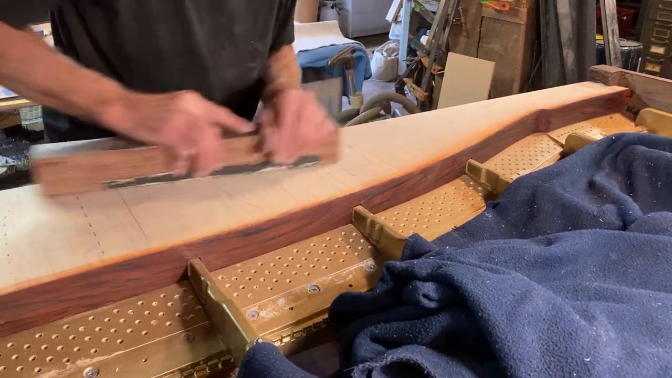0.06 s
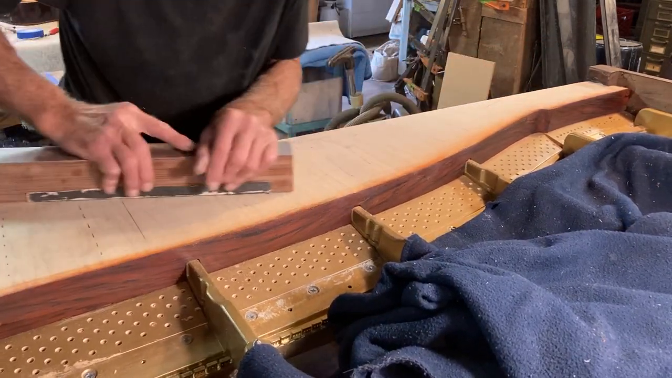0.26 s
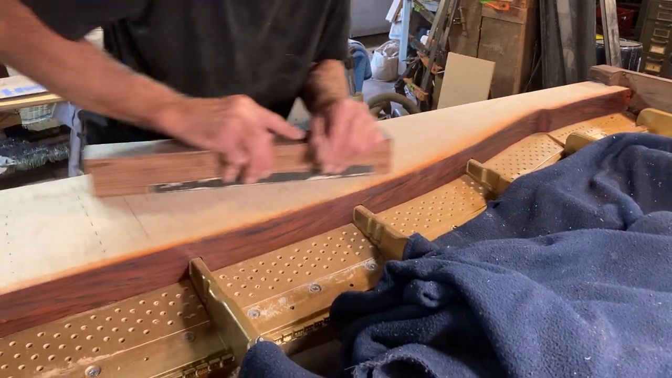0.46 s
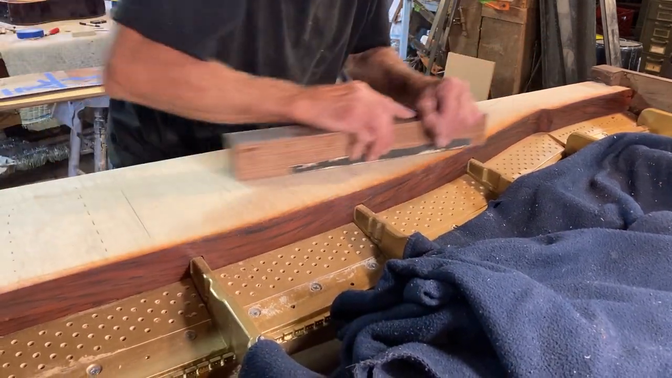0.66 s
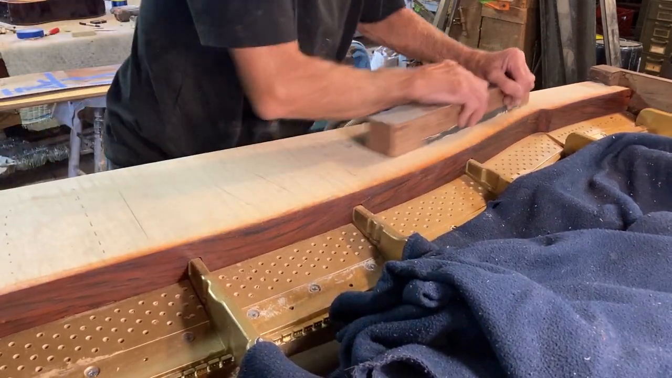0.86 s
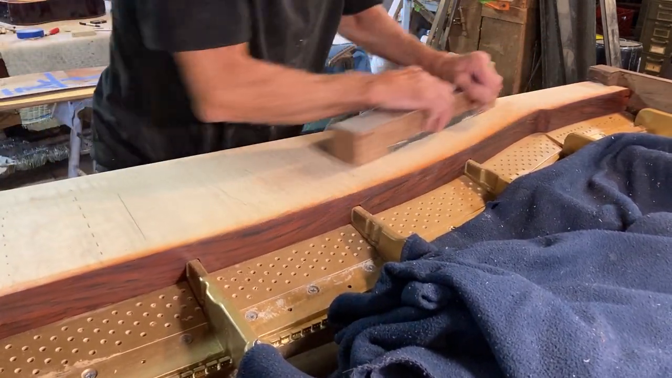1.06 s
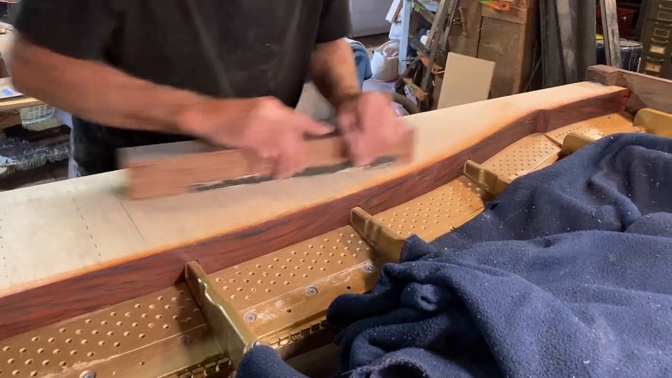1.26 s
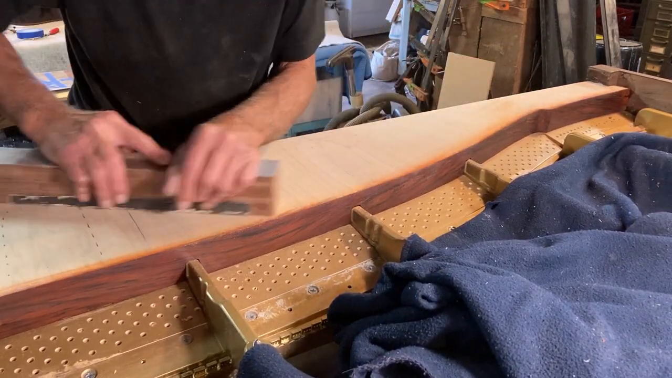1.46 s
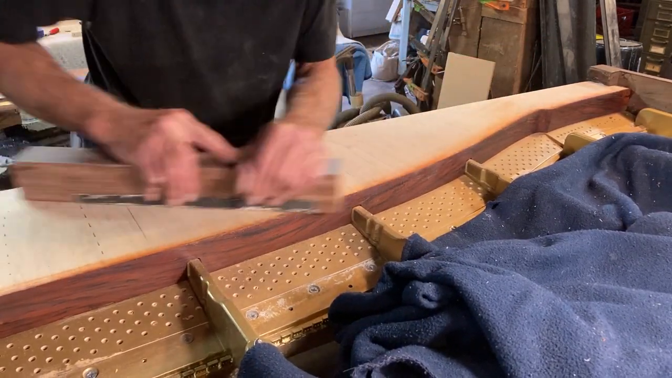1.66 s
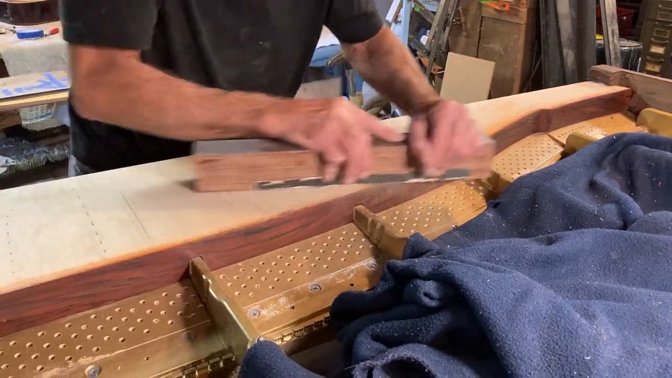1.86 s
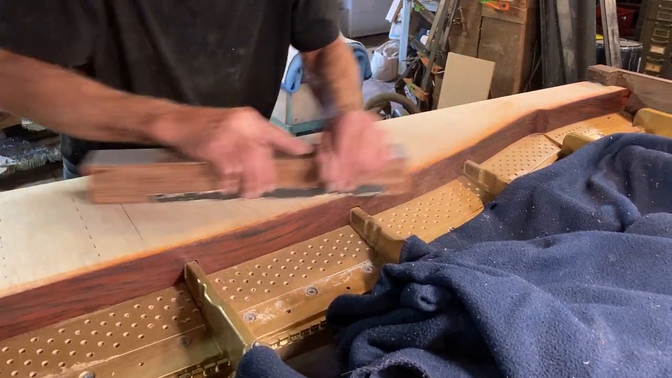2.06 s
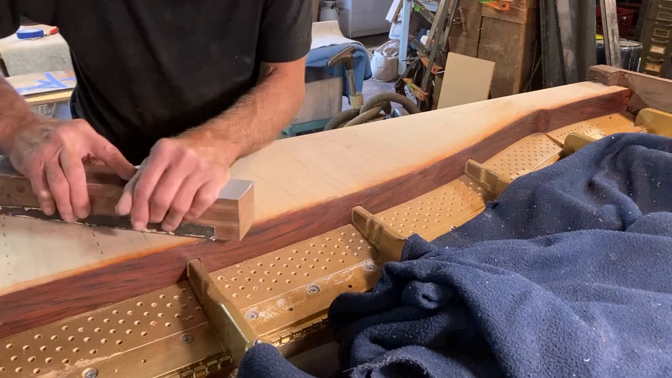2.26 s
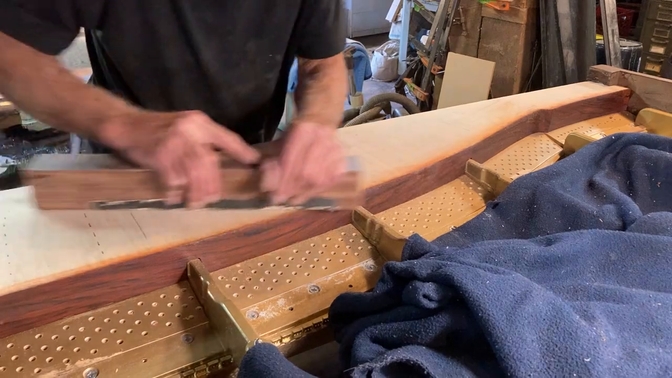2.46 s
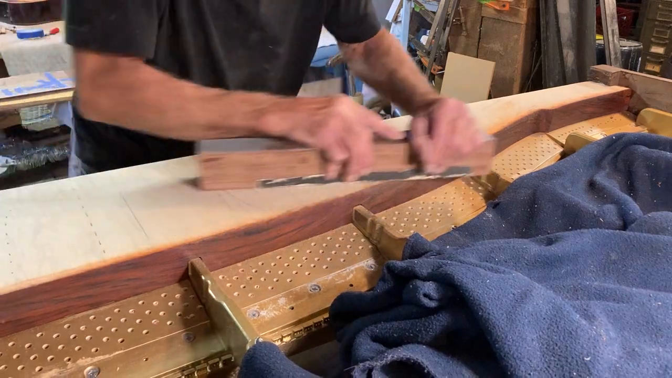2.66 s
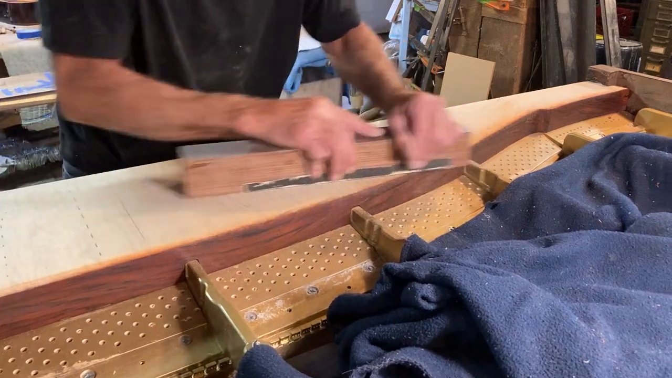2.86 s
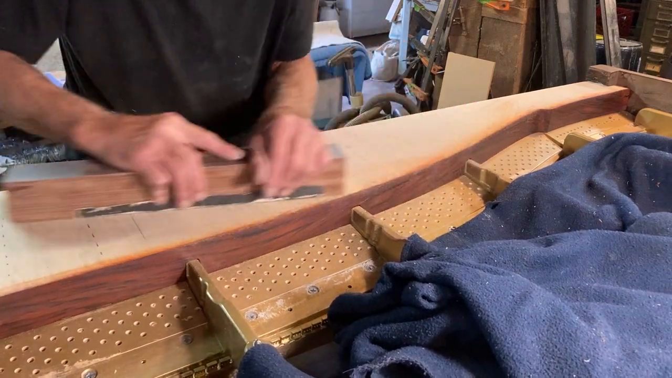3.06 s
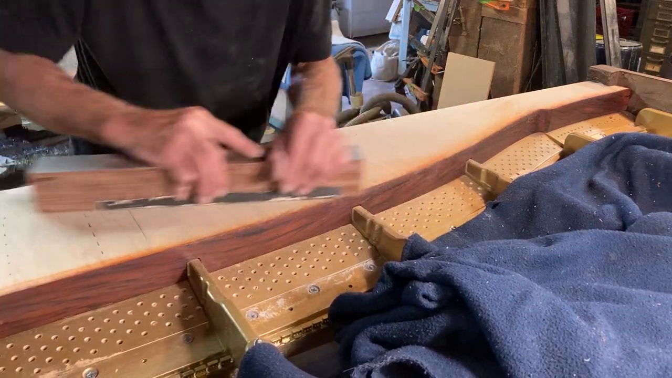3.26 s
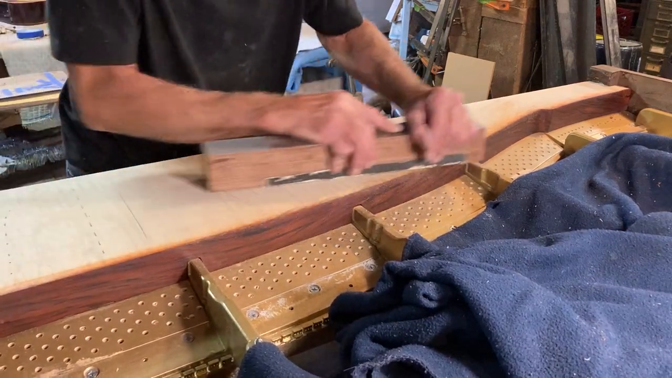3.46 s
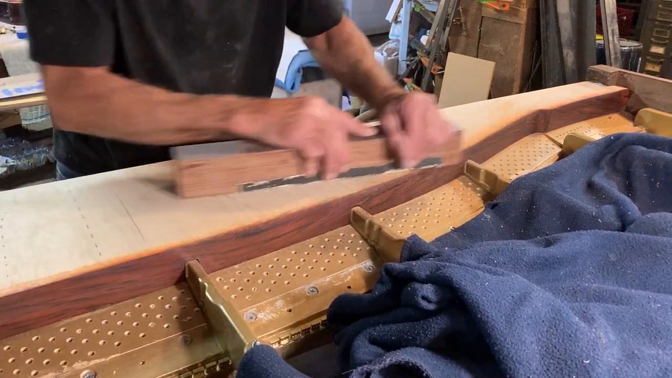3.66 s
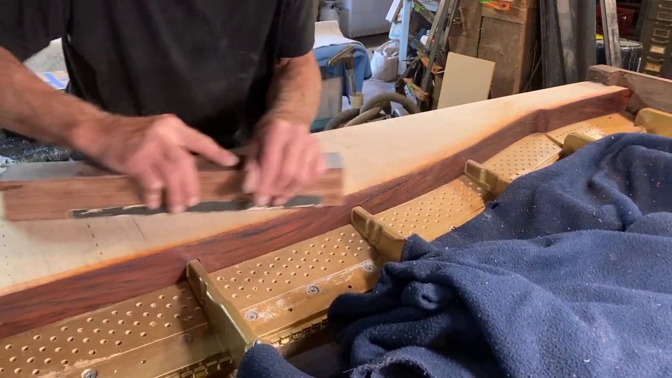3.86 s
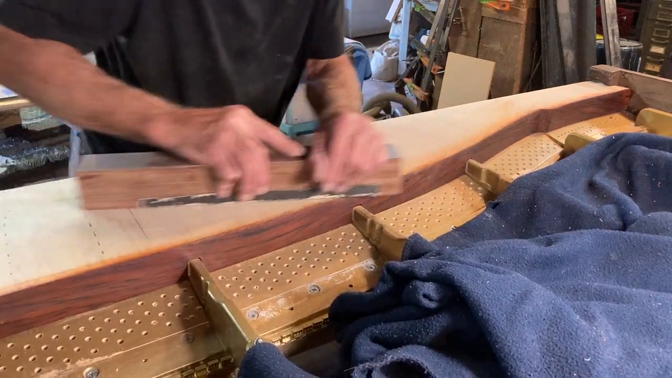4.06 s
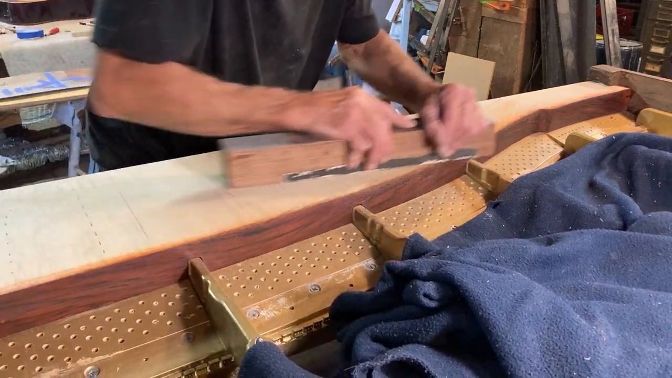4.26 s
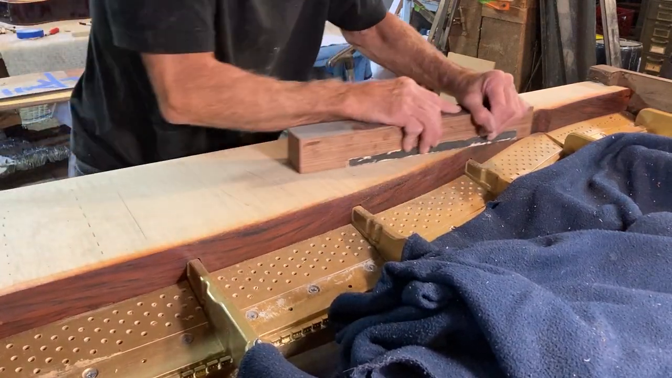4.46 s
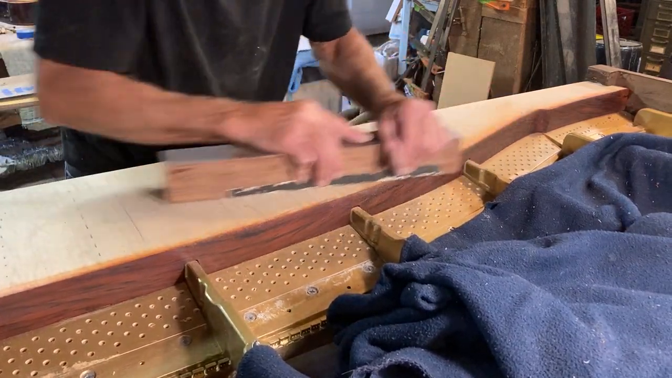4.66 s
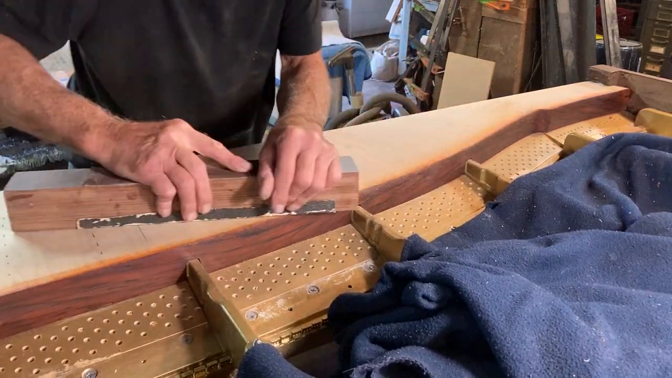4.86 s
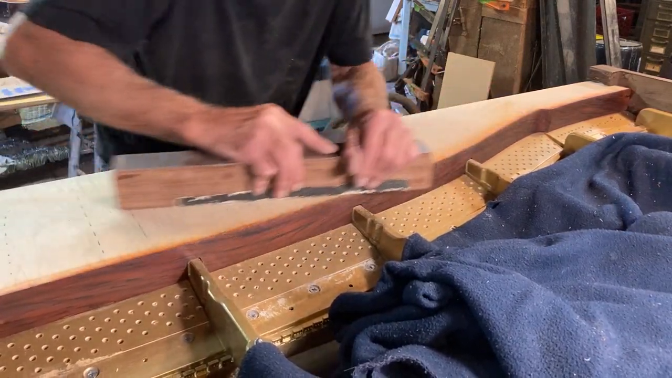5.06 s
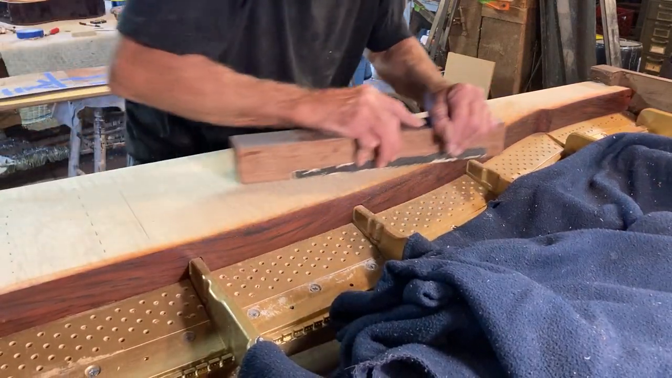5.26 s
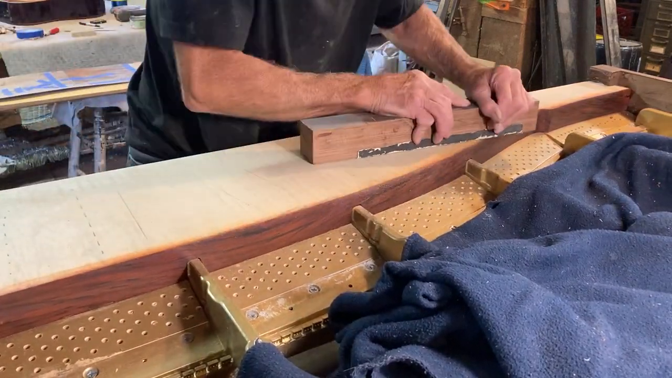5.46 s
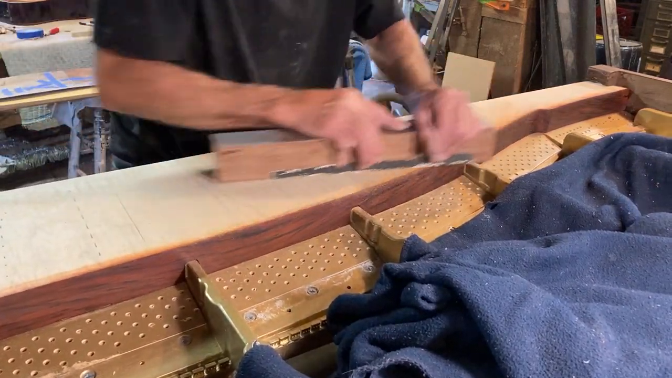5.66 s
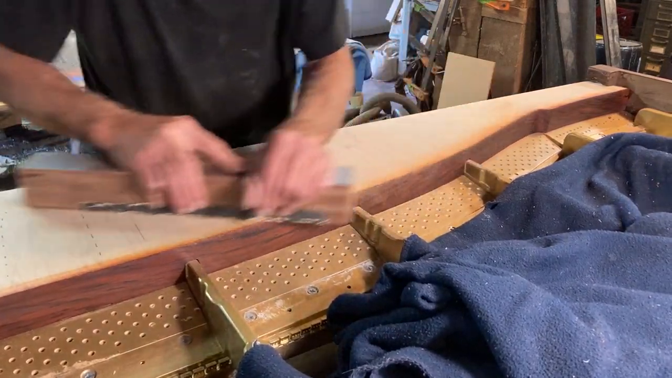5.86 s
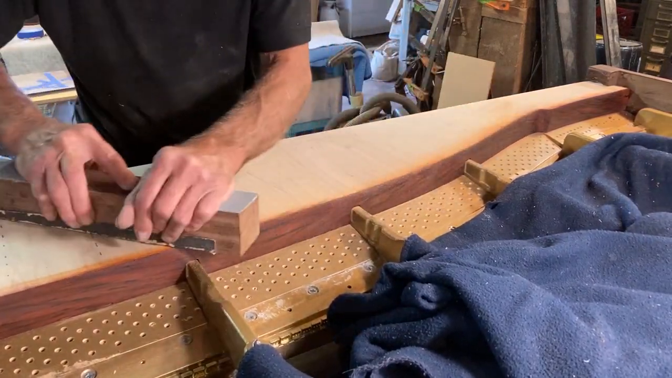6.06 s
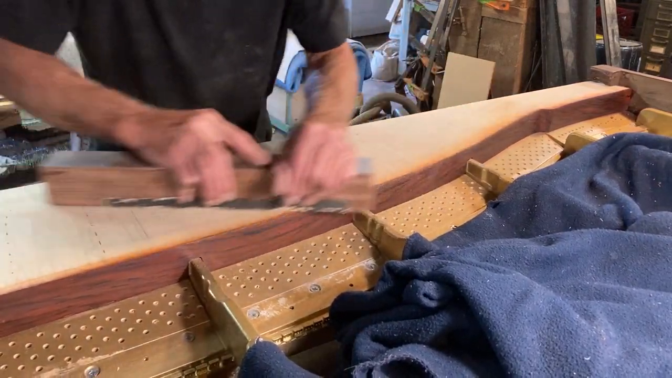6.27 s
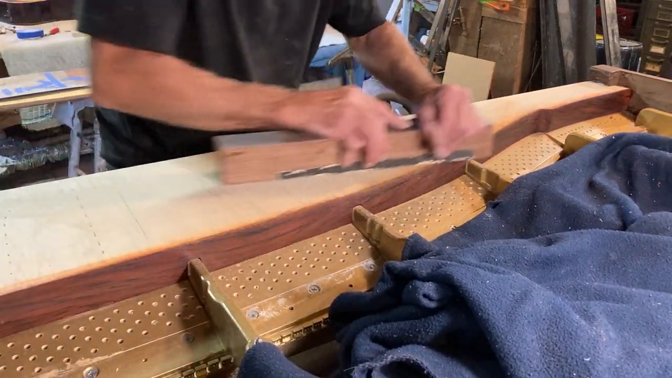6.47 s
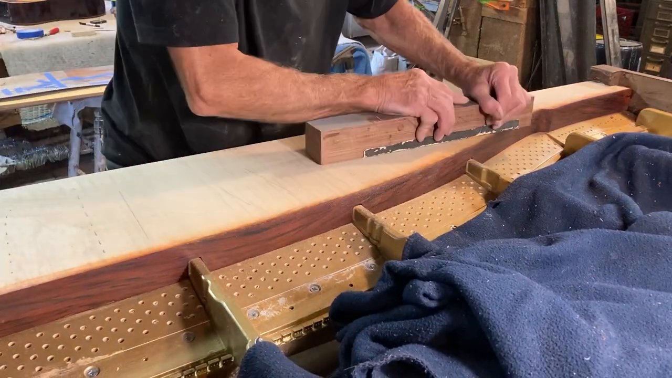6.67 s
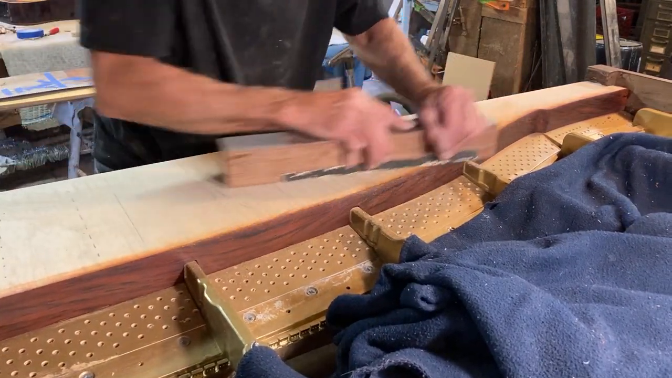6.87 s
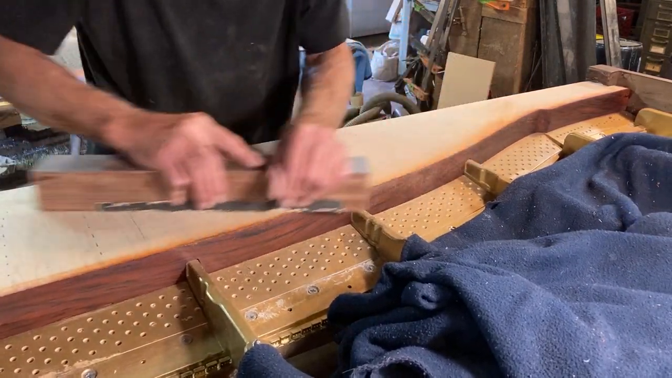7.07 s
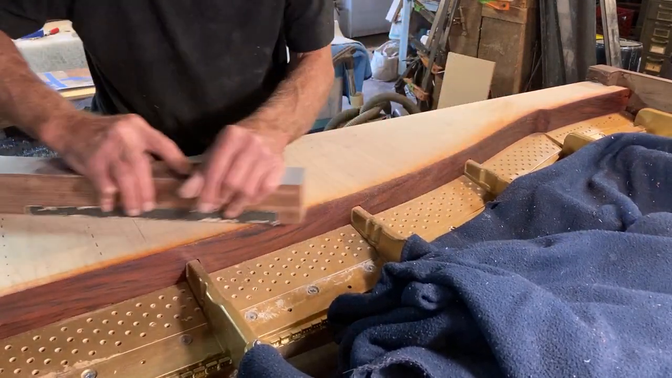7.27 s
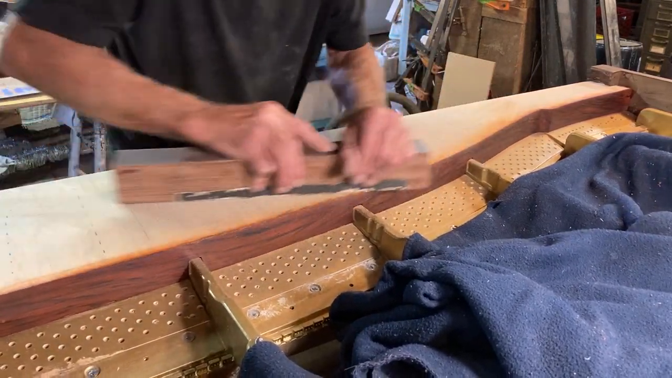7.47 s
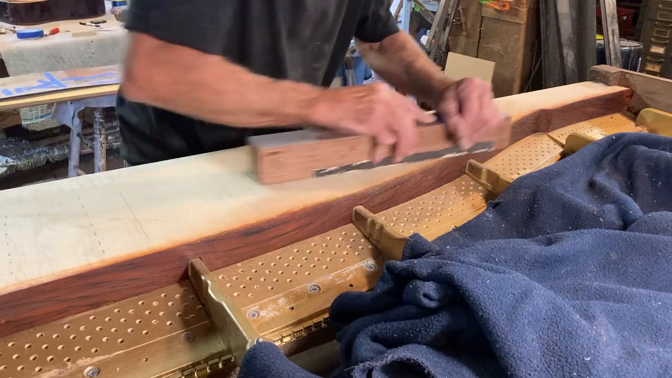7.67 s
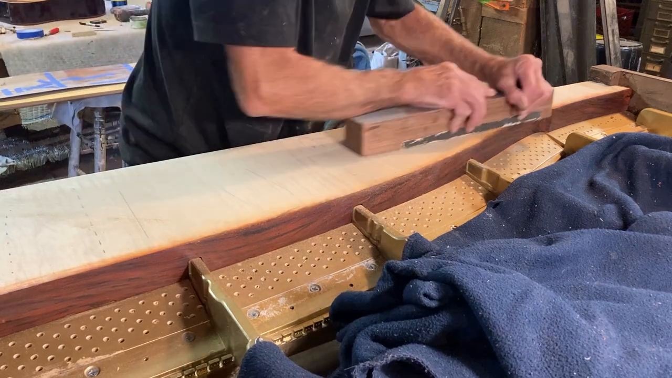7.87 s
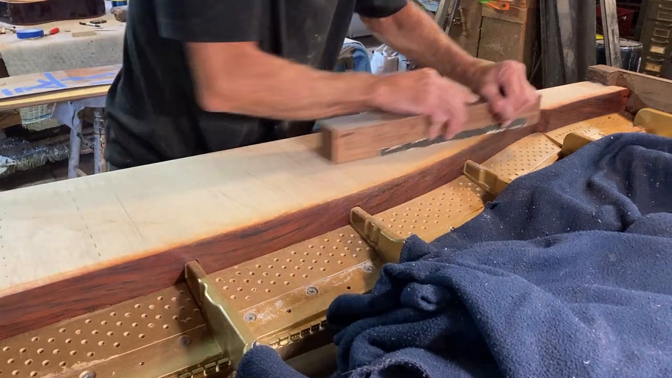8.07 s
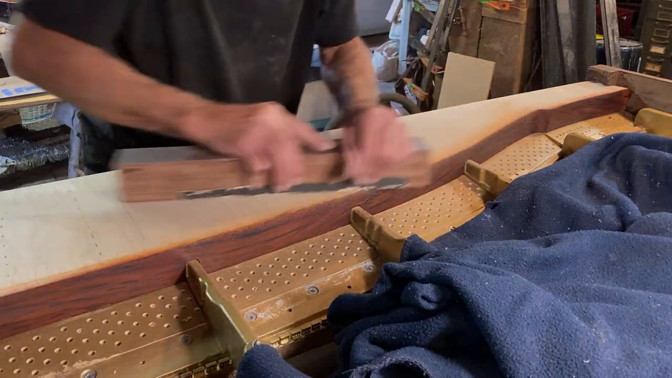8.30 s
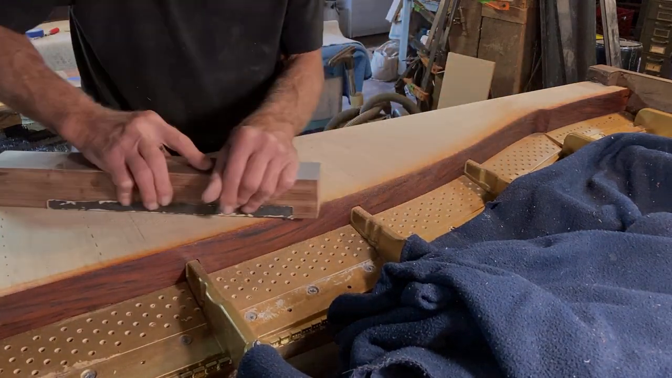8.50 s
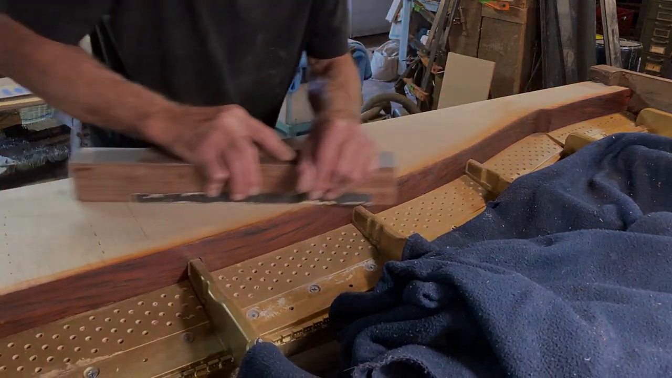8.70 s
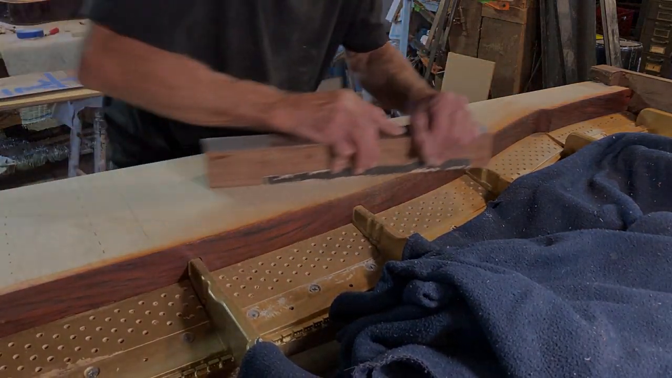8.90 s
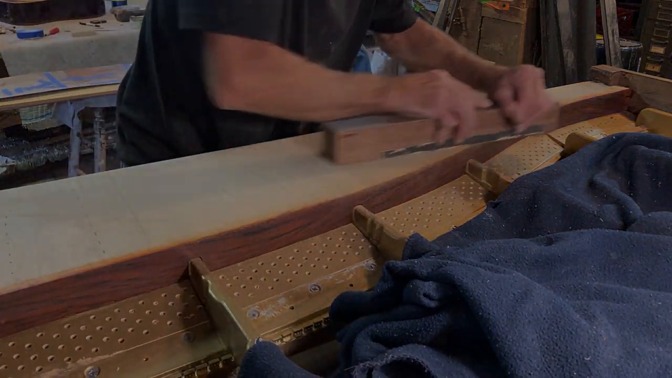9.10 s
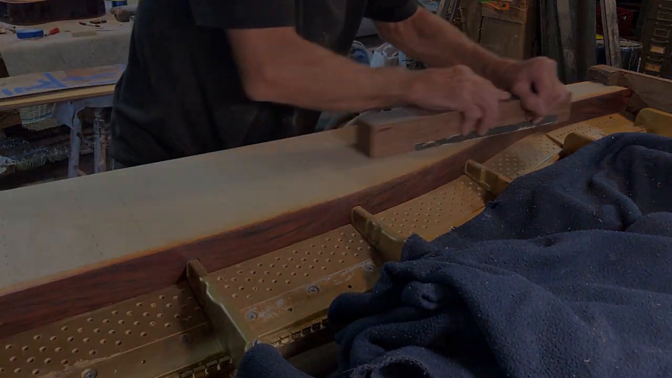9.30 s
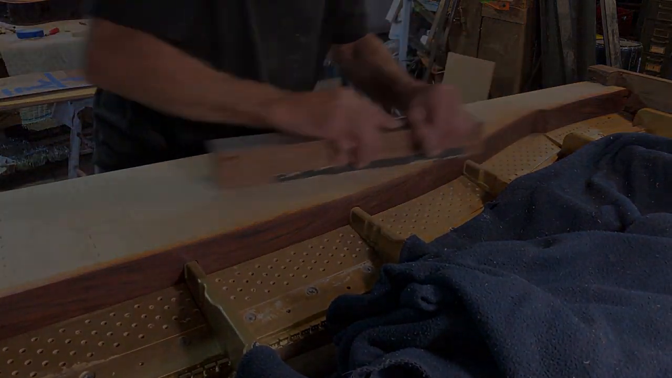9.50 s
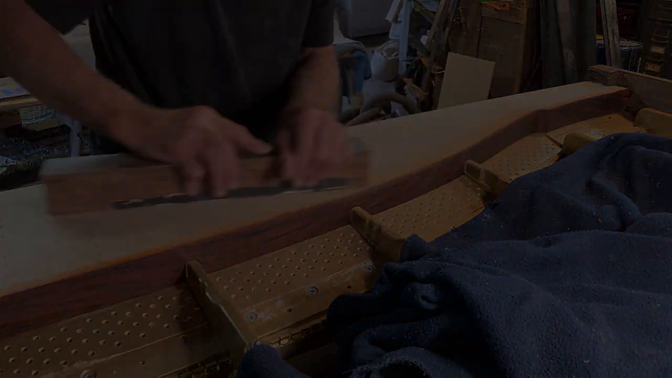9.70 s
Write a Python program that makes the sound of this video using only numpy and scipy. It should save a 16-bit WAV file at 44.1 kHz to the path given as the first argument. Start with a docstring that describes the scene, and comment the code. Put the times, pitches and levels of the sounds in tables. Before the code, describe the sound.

Brisk hand-sanding strokes hiss across resonant wood in a workshop, louder on each pull, dipping quiet at every turn, with two knocks near the start.

```python
"""A long sanding block with coarse paper is hand-rubbed to and fro on the wooden top of a piano case in a workshop.
A pull ends, the block knocks and the case booms; faster strokes follow, with a second knock early on, then longer ones.
Clicking grit makes the rasp, quiet at every turn; filtered noise and decaying modes make the case drone.
A moving delay sweeps the block past a close pair of microphones; faint gliding sines squeak in the first strokes."""
import sys
import numpy as np
from scipy import signal
from scipy.fft import rfft, irfft, next_fast_len
from scipy.io import wavfile
from scipy.ndimage import map_coordinates

SR = 44100
rng = np.random.default_rng(int(sys.argv[2]) if len(sys.argv) > 2 else 0)


def unload_wav(signal):
    """Save mono or channel-first audio to the path in sys.argv[1] as 16-bit WAV at rate SR, clipped to [-1, 1]."""
    wavfile.write(
        sys.argv[1],
        SR,
        np.round(np.clip(np.atleast_2d(signal).T, -1, 1) * 32767).astype(np.int16),
    )


N = 429534

# pushes away from the body, levels before speed and trims:
# start_s, end_s, rasp_db, rasp_growth_db, rasp_arch_db, scrape_db, hum_db, groan_db
PUSH_STROKES = [(0.209, 0.974, -25, 4, -1.5, -37, -44, -39),
                (1.507, 1.953, -22.5, 1, -3.5, -36, -43, -40.5),
                (2.297, 2.815, -24, -1, -4.5, -38.0, -43, -45),
                (3.164, 3.609, -23, -0.5, -2.5, -37.0, -45.5, -44.0),
                (3.93, 4.497, -26.5, -2, -7, -37, -44.0, -41.5),
                (4.901, 5.533, -29.5, -5.5, -9, -38.5, -43.5, -42.0),
                (6.083, 6.736, -21.5, -6.5, 3.5, -38.0, -43, -40),
                (7.241, 8.007, -25.5, -6.5, -4.0, -39, -42, -41),
                (8.5, 9.294, -27.5, 2.5, -1, -40.5, -44.5, -41.5)]
# pulls back, louder and rounder: same columns
PULL_STROKES = [(-0.3, 0.144, -28, 5, -5.5, -37.5, -46.5, -53),
                (0.898, 1.555, -18.0, 3.5, 12, -37.0, -41, -44.5),
                (1.902, 2.368, -19.5, 0, 4.5, -38, -48.5, -48.5),
                (2.767, 3.218, -22.0, 3.5, -3, -38, -45, -53.5),
                (3.559, 3.979, -21.0, 2.5, -4.5, -37, -44.5, -50.5),
                (4.452, 4.947, -20.0, -1, 3, -39, -44.5, -50.5),
                (5.491, 6.12, -18.5, -2.5, 7.5, -38, -40.5, -45.5),
                (6.689, 7.288, -20.0, 0.5, 5, -39, -44, -46),
                (7.96, 8.581, -20.0, -3.5, 7, -40, -43.5, -46.0),
                (9.249, 9.842, -23, -5, 8.5, -39.5, -44.5, -44)]
# rasp of the grit: freq_hz, relative_db
RASP_SPECTRUM = [(900, -54), (2000, -18), (3100, -10.5), (4000, -1.5), (4800, -2.5), (5900, -3), (6400, -1),
                 (7200, 0), (8200, -2.5), (9800, -3), (12000, -9.5), (14500, -16.5), (16000, -22)]
# scrape of the grit: freq_hz, relative_db
SCRAPE_SPECTRUM = [(300, -32), (600, -10), (850, -10.5), (950, -5), (1050, -8.5), (1190, 0), (1300, -4),
                   (1550, -2), (2100, 2.5), (2700, 3), (4000, 1.5), (7000, -39), (14000, -38)]
# extra phase lead of the left microphone: freq_hz, lead_rad
LEFT_PHASE_LEAD = [(500, 0.53), (1400, -0.39), (2900, 1.06), (3800, 1.36), (4600, 0.33), (6000, 0.034)]
# gain of the rubbing spread along the block, unlike at the two microphones: freq_hz, gain_db
SPREAD_GAIN = [(500, -5), (1500, -4), (3000, -5), (5000, -5), (6200, -5.5), (7000, -15), (9200, -19),
               (11000, -13), (14000, -16)]
# deep friction hum of the case: freq_hz, relative_db
HUM_SPECTRUM = [(40, -29), (66, -30), (82, -9), (100, -37), (122, -14.5), (140, 4), (158, 1), (178, -11),
                (230, -2), (275, -13.5), (400, -47)]
# hollow friction groan of the case: freq_hz, relative_db
GROAN_SPECTRUM = [(190, -17), (280, 1.5), (310, 6), (340, -8.5), (365, 5), (388, -4), (410, 1), (480, 3),
                  (540, -6.5), (620, -15), (1000, -34)]
# modes of the case: freq_hz, relative_db, t60_s, build_up_s
CASE_MODES = [(81.8, -24.5, .6, .02), (124, -6, .35, .03), (142.8, 6.5, 0.43, 0.029),
              (160, -1.5, 0.58, 0.027), (195.3, 1, 0.49, 0.024), (230, -26, .3, 0.022),
              (275.2, 3.5, 0.5, 0.072), (311, -26, 0.17, .02), (347, -8, 0.39, .015),
              (408.3, 4.5, 0.22, 0.0021), (441.6, -1, 0.22, 0.0019), (477, -18, 0.42, 0.0022),
              (680, -1.5, 0.1, 0.00071), (785, -2.5, 0.1, .002), (950, -20, 0.4, 0.0022),
              (1211, -6.5, 0.095, .002), (1380, -14, 0.13, .002)]
# contacts of the knocking block, levels before trims:
# start_s, ring_db, thud_db, crack_db, contact_s, extra_lowest_mode_db
KNOCK_CONTACTS = [(0.203, -42, -31, -48, .0004, 0), (0.209, -31, -23.5, -60, 0.00094, 24),
                  (0.215, -35, -20, -62, 0.001, 0), (0.271, -37, -20.5, -60, 0.003, 34),
                  (2.2635, -26, -16, -11, .00015, 0), (2.2667, -27, -18, -16.5, 0.00017, 0),
                  (2.274, -15.5, -24, -38, .0003, -8), (2.31, -28.5, -16, -44, 0.00038, -4)]
# thud of a knock: freq_hz, relative_db
THUD_SPECTRUM = [(40, -32), (62, -22), (80, -7.5), (102, -18), (150, 0.5), (250, -3.5), (430, 1.5),
                 (560, -10), (800, -21), (1300, -20), (2500, -34)]
# decay of the thud in the case: freq_hz, t60_s
THUD_DECAY = [(100, 0.64), (300, 0.15), (600, 0.22), (1500, 0.098)]
# crack at the contact: freq_hz, relative_db
CRACK_SPECTRUM = [(200, -22), (600, 1), (1500, 3.5), (2600, -1.5), (4200, 7), (5500, -8), (9000, -7),
                  (16000, -29)]
# the block singing on the wood, level before trim: start_s, length_s, centre_pitch_hz, level_db
SQUEAK_EVENTS = [(0.53, 0.22, 1190, -42.5), (2.454, 0.055, 1220, -46), (2.483, 0.11, 944, -48)]
# decay of the workshop's reflections: freq_hz, t60_s
REFLECTION_DECAY = [(200, 0.25), (2000, 0.072), (6000, 0.077), (14000, 0.024)]
# level of the workshop's reflections: freq_hz, gain_db
REFLECTION_GAIN = [(500, 0), (1500, 0), (3000, -3.5), (6000, -3), (7500, -36)]
# quiet of the workshop: freq_hz, relative_db
FLOOR_SPECTRUM = [(25, -12), (48, 2), (64, -6), (82, 10), (100, -4), (150, 9.5), (400, -19), (1000, -8.5),
                  (4000, -28), (16000, -40)]
# colour tilt between the microphones: freq_hz, left_minus_right_db
MIC_TILT = [(300, 0.3), (1200, 2.5), (3200, 2.5), (4300, 1.5), (5300, -1.3), (6600, -0.5)]

# hand getting up to speed and braking: start_up_s, braking_s
PUSH_EASE_S, PULL_EASE_S = (0.072, 0.078), (0.072, 0.083)
# answer of the case, rising through a push, flatter in a pull: growth_db, mid_stroke_arch_db
PUSH_HUM_DB, PUSH_GROAN_DB = (11, 2), (12.2, 3.4)
PULL_HUM_DB, PULL_GROAN_DB = (1.4, .8), (3.5, 2)
# exponents of amplitude on hand speed: rasp, scrape, hum, groan
SPEED_EXPONENTS = (4, 2.25, .7, 1.03)
# scale of the random unsteadiness of hand pressure
PAPER_WAVER_DB, CASE_WAVER_DB = 0.45, 1.52
# left microphone's lead at the ends of the path, and its drift as the work moves along
NEAR_LEAD_MS, FAR_LEAD_MS, DRIFT_MS_PER_S = 0.19, 0.0085, -0.0047
# rasp change from near to far end, below and above the split
FAR_MIDS_DB, FAR_TREBLE_DB, COLOUR_SPLIT_HZ = -2.5, 1.2, 4300
TOP_HZ = 15750  # band limit


def amp(db):
    """Decibels to gain."""
    return 10 ** (np.asarray(db) / 20)


def unit(x):
    """Scaled to rms 1."""
    return x / np.sqrt(np.mean(x ** 2) + 1e-20)


def along(points, hz):
    """(Hz, value) points read on a log frequency axis."""
    f, v = np.transpose(points)
    return np.interp(np.log(hz + 1), np.log(f + 1), v)


def wobble(knots_per_s):
    """A smooth random curve through normally distributed knots."""
    knots = rng.standard_normal(int(N * knots_per_s / SR) + 4)
    return map_coordinates(knots, [np.arange(N) * knots_per_s / SR])


def filtered(x, response):
    """x through a complex frequency response."""
    size = x.shape[-1]
    fft_size = next_fast_len(size + 8192)
    spectrum = rfft(x, fft_size) * response(np.fft.rfftfreq(fft_size, 1 / SR))
    return irfft(spectrum, fft_size)[..., :size]


def coloured(x, spectrum):
    """x shaped by a spectrum, at rms 1."""
    return unit(filtered(x, lambda hz: amp(along(spectrum, hz))))


def tail(decay, size):
    """Stereo noise dying at its own speed per frequency, left channel at energy 1."""
    hz, t, z = signal.stft(rng.standard_normal((2, size)), SR, nperseg=256)
    z = z * 10 ** (-3 * t / along(decay, hz)[:, None])
    ring = signal.istft(z, SR, nperseg=256)[1][:, :size]
    return ring / np.linalg.norm(ring[0])


def narrowed(pair, side_db):
    """Two unrelated signals as middle and side; long waves reach both microphones alike."""
    side = filtered(pair[1], lambda hz: hz / np.hypot(hz, 500))
    return pair[0] + amp(side_db) * np.array([side, -side])


def strokes(rows, ease_s, hum_shape_db, groan_shape_db):
    """Power of rasp, scrape, hum and groan one way: each stroke speeds up, leans on the wood and brakes."""
    power, t = np.zeros((4, N)), np.arange(N) / SR
    for start, end, rasp_db, growth_db, arch_db, scrape_db, hum_db, groan_db in rows:
        now = slice(*np.searchsorted(t, [start, end]))
        done = (t[now] - start) / (end - start)
        speed_up = np.tanh((t[now] - start) / ease_s[0])
        braking = np.tanh((end - t[now]) / ease_s[1])
        speed = np.abs(speed_up * braking)
        lean = lambda growth, arch: growth * (done - .5) + arch * (np.sin(np.pi * done) - 1)
        levels_db = [rasp_db + lean(growth_db, arch_db), scrape_db,
                     hum_db + lean(*hum_shape_db), groan_db + lean(*groan_shape_db)]
        power[:, now] += [(amp(db) * speed ** law) ** 2 for db, law in zip(levels_db, SPEED_EXPONENTS)]
    return power


def rubbing(rest_db=-76):
    """Four rubbing levels in dB; where push and pull overlap, the block turns without quite stopping."""
    pushed = strokes(PUSH_STROKES, PUSH_EASE_S, PUSH_HUM_DB, PUSH_GROAN_DB)
    pulled = strokes(PULL_STROKES, PULL_EASE_S, PULL_HUM_DB, PULL_GROAN_DB)
    return 10 * np.log10(pushed + pulled + amp(rest_db) ** 2)


def place():
    """Block position per sample: 0 at the near end of its path, 1 at the far end."""
    t = np.arange(N) / SR
    travelled = lambda rows: sum(np.clip((t - start) / (end - start), 0, 1) for start, end, *_ in rows)
    return 1 + travelled(PUSH_STROKES) - travelled(PULL_STROKES)


def grit(grains_per_s, spread_db, count):
    """Grains snag and tear wood fibres: tiny clicks of uneven size at random instants."""
    chance = np.clip(grains_per_s / SR, .01, 1)
    snags = rng.random((count, N)) < chance
    sizes = rng.standard_normal((count, N)) * amp(spread_db * rng.standard_normal((count, N)))
    return snags * sizes / np.sqrt(chance)


def sandpaper(rasp_db, scrape_db):
    """Three paper patches: faster rubbing meets more grains, colour follows position, judder shakes the level."""
    speed = amp((rasp_db - rasp_db.max()) / 2)
    rasp = coloured(grit(4000 + 28000 * speed, spread_db=0.5, count=3), RASP_SPECTRUM) * amp(rasp_db - 1.36)
    mids = filtered(rasp, lambda hz: 1 / (1 + (hz / COLOUR_SPLIT_HZ) ** 10))
    away = place() - .5
    rasp = mids * amp(FAR_MIDS_DB * away) + (rasp - mids) * amp(FAR_TREBLE_DB * away)
    scrape_grit = grit(1800 + 7000 * speed, spread_db=2.5, count=3)
    scrape = coloured(scrape_grit, SCRAPE_SPECTRUM) * amp(scrape_db - 0.65)
    judder_db = PAPER_WAVER_DB * wobble(14) + 0.51 * wobble(45) + 0.24 * wobble(260)
    return (rasp + scrape) * amp(judder_db)


def passing(x):
    """The block's place along the case sets the lead between the microphones."""
    lead_ms = NEAR_LEAD_MS + (FAR_LEAD_MS - NEAR_LEAD_MS) * place() + DRIFT_MS_PER_S * np.arange(N) / SR
    shift = lead_ms * SR / 1000 / 2  # samples, half to each channel
    return np.array([map_coordinates(x, [np.arange(N) + side * shift], order=3) for side in (1, -1)])


def microphones(x, split_hz, skew_ms):
    """Lows and mids follow the block; top treble has a fixed lag and opposite polarity between channels."""
    low = lambda hz: 1 / np.sqrt(1 + (hz / split_hz) ** 40)
    high = lambda hz: np.sqrt(1 - low(hz) ** 2)
    apart = lambda radians: np.exp(.5j * np.array([radians, -radians]))
    treble = filtered(x, lambda hz: high(hz) * apart(np.pi - 2 * np.pi * hz * skew_ms / 1000))
    return filtered(passing(x), lambda hz: low(hz) * apart(along(LEFT_PHASE_LEAD, hz))) + treble


def case_ring(bass_db=0):
    """Case modes after one push: each swells and decays; the spot struck sets the lowest."""
    t = np.arange(SR // 2) / SR
    swell = lambda t60, rise: 10 ** (-3 * t / t60) * (1 - np.exp(-t / rise))
    modes = [amp(db + rng.normal(0, 0.8)) * swell(t60, rise) * np.sin(2 * np.pi * hz * t)
             for hz, db, t60, rise in CASE_MODES]
    return amp(bass_db) * modes[0] + sum(modes[1:])


def drone(hum_db, groan_db):
    """Friction shakes the case: a deep hum, a hollow groan and the noise-driven ring of its modes."""
    waver_db = CASE_WAVER_DB * wobble(12)
    hum = unit(narrowed(coloured(rng.standard_normal((2, N)), HUM_SPECTRUM), side_db=-8))
    hum = hum * amp(hum_db + waver_db + 1.8)
    groan = unit(narrowed(coloured(rng.standard_normal((2, N)), GROAN_SPECTRUM), side_db=-4))
    groan = groan * amp(groan_db + waver_db + wobble(40) + 0.7)
    ring = case_ring(bass_db=18)
    modes = signal.fftconvolve(rng.standard_normal(N) * amp(hum_db), ring / np.linalg.norm(ring))[:N]
    return hum + groan + amp(-8) * modes


def knocks(crack_t60_s=0.021):
    """Each contact cracks, thuds and rings in the case; a longer contact sounds duller."""
    out, t = np.zeros((2, N + SR)), np.arange(SR // 2) / SR
    crack_fade = amp(-60 * t / crack_t60_s) + amp(-14.5 - 60 * t / 0.19)
    for start_s, ring_db, thud_db, crack_db, contact_s, bass_db in KNOCK_CONTACTS:
        thud = narrowed(coloured(tail(THUD_DECAY, size=len(t)), THUD_SPECTRUM), side_db=-1.0)
        thud = thud * (1 - np.exp(-t / 0.0038))
        boom = amp(ring_db - 4.5) * case_ring(bass_db) + amp(thud_db - 17.5) * thud
        boom = filtered(boom, lambda hz: 1 / (1 + 1j * hz * contact_s) ** 2)
        crack = coloured(rng.standard_normal((2, len(t))), CRACK_SPECTRUM) * crack_fade
        out[:, round(start_s * SR):][:, :len(t)] += boom + amp(crack_db) * crack
    return out[:, :N]


def squeaks(waver_hz=14):
    """The sliding block briefly holds one wooden resonance: a sine of wavering pitch."""
    out = np.zeros(N + SR)
    for start_s, length_s, hz, db in SQUEAK_EVENTS:
        size = round(length_s * SR)
        pitch_hz = hz + waver_hz * wobble(147)[:size]
        tone = np.sin(2 * np.pi * np.cumsum(pitch_hz) / SR)
        out[round(start_s * SR):][:size] += amp(db + 1.5) * np.sqrt(np.hanning(size)) * tone
    return out[:N]


def workshop(x):
    """Bench and crowded walls scatter the sound back, by new crossfaded random paths nine times a second."""
    hop = SR // 9
    fade = np.sin(np.pi * np.arange(2 * hop) / (2 * hop))
    padded, echo = np.pad(x, (hop, 2 * hop)), np.zeros((2, N + SR))
    for start in range(0, N + hop, hop):
        piece = padded[start:start + 2 * hop] * fade
        answer = signal.fftconvolve(piece[None], tail(REFLECTION_DECAY, size=8192), axes=1)
        echo[:, start:start + answer.shape[1]] += answer
    return filtered(echo[:, hop:hop + N], lambda hz: amp(along(REFLECTION_GAIN, hz)))


def room_floor():
    """The quiet of the workshop: steady coloured noise, wide in stereo."""
    return amp(-55.5) * narrowed(coloured(rng.standard_normal((2, N)), FLOOR_SPECTRUM), side_db=1)


def scene():
    """Rubbing along the block, its reflections, the case and the quiet of the workshop."""
    rasp_db, scrape_db, hum_db, groan_db = rubbing()
    rub = sandpaper(rasp_db, scrape_db)
    direct = microphones(rub[0], split_hz=6300, skew_ms=.2174)
    wide = filtered(rub[1:], lambda hz: amp(along(SPREAD_GAIN, hz)))  # one patch per channel
    return direct + wide + workshop(rub[0]) + drone(hum_db, groan_db) + knocks() + squeaks() + room_floor()


def record(dry, low_cut_hz=45):
    """Microphones differ in colour, shed the deepest bass, round off the highest peaks and end at the band limit."""
    low_cut = lambda hz: (1j * hz / (low_cut_hz + 1j * hz)) ** 2
    tilt = lambda hz: amp(np.array([[1], [-1]]) * along(MIC_TILT, hz) / 2)
    x = filtered(dry, lambda hz: tilt(hz) * low_cut(hz))
    x = x / (1 + np.abs(x / .85) ** 6) ** (1 / 6)
    return filtered(x, lambda hz: hz < TOP_HZ)


dry = scene()
out = record(dry)
unload_wav(out)
```